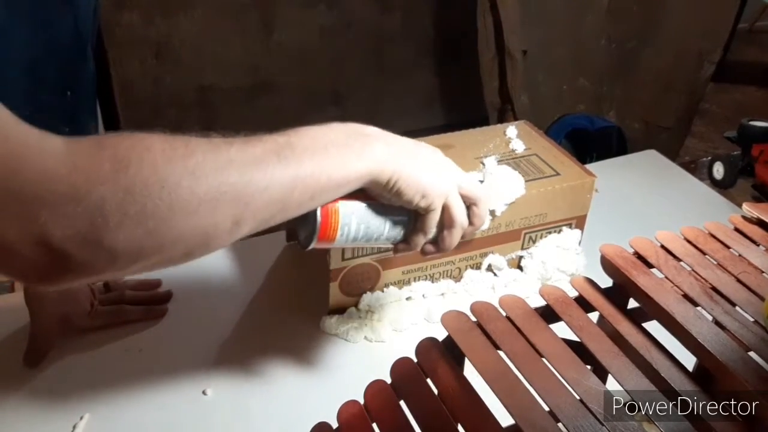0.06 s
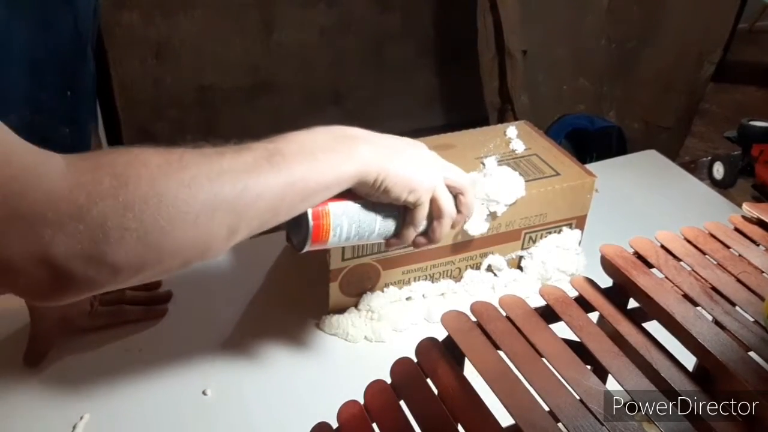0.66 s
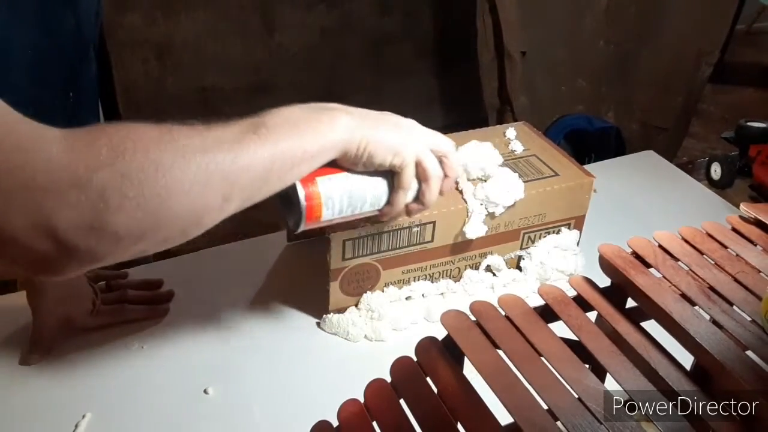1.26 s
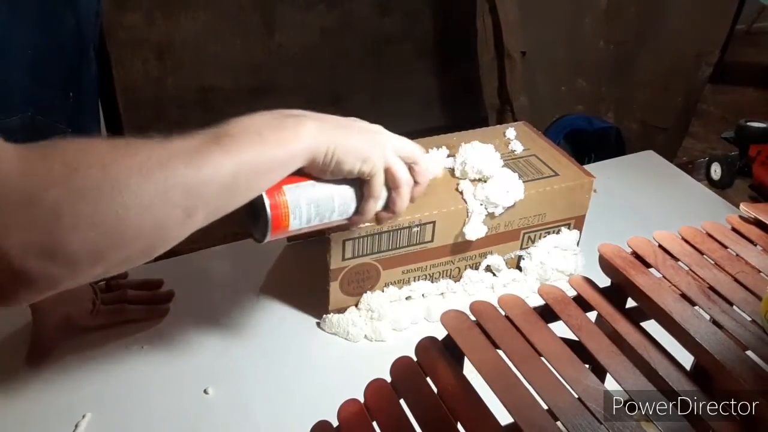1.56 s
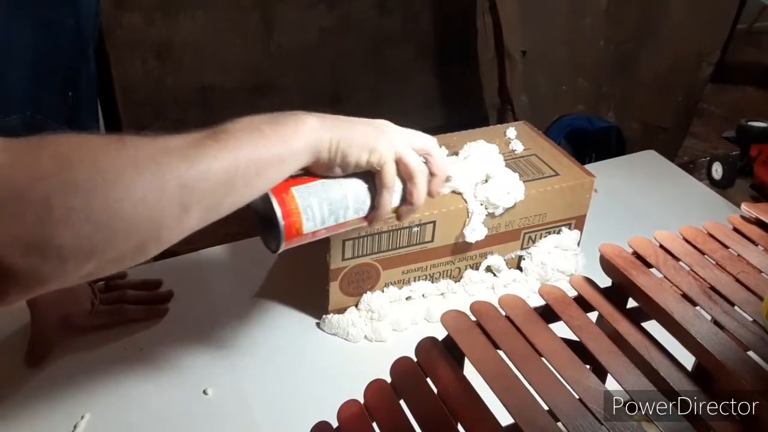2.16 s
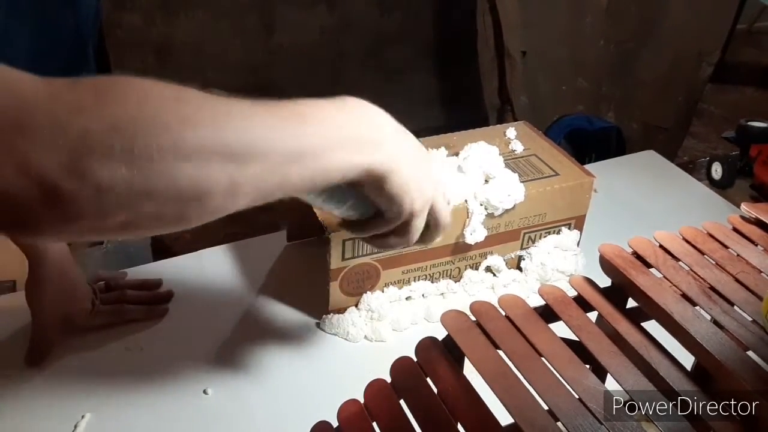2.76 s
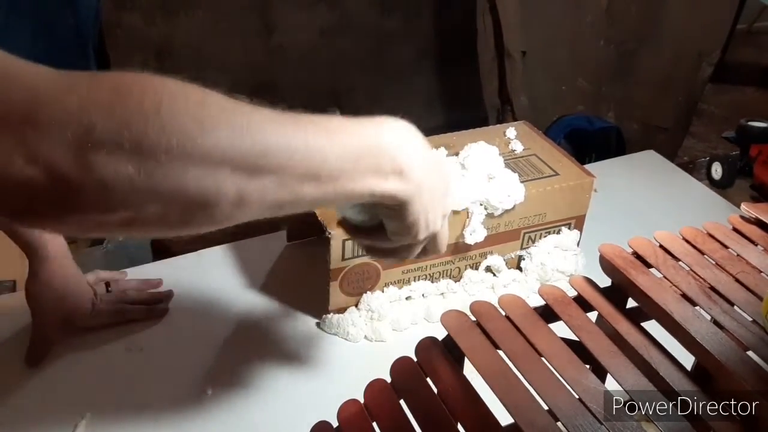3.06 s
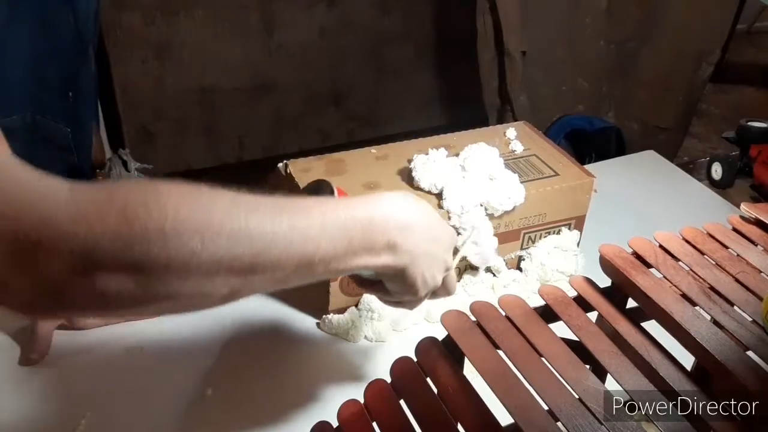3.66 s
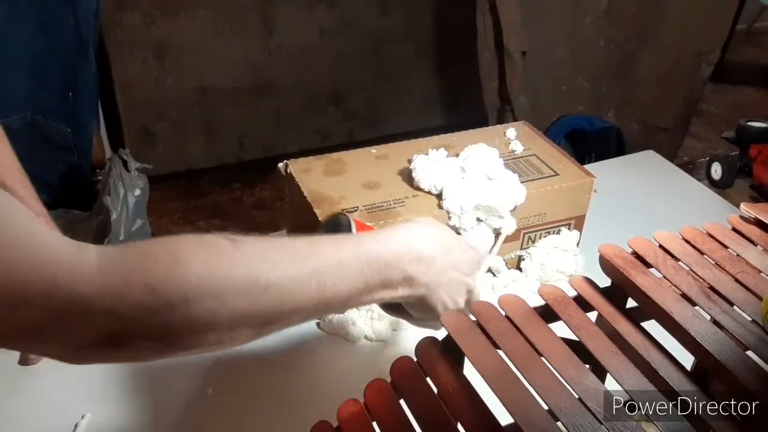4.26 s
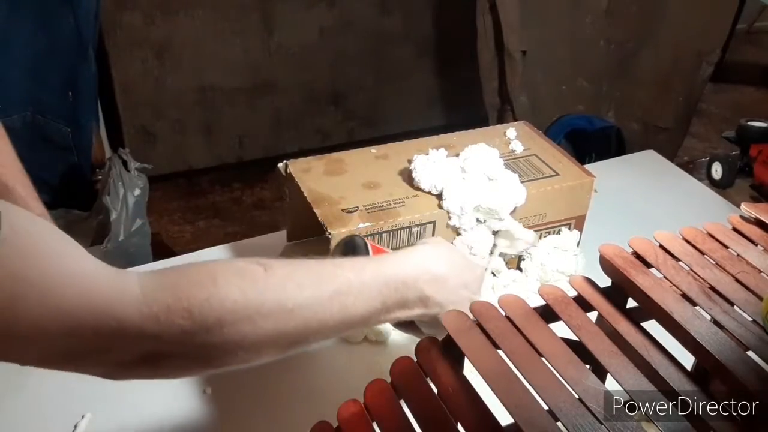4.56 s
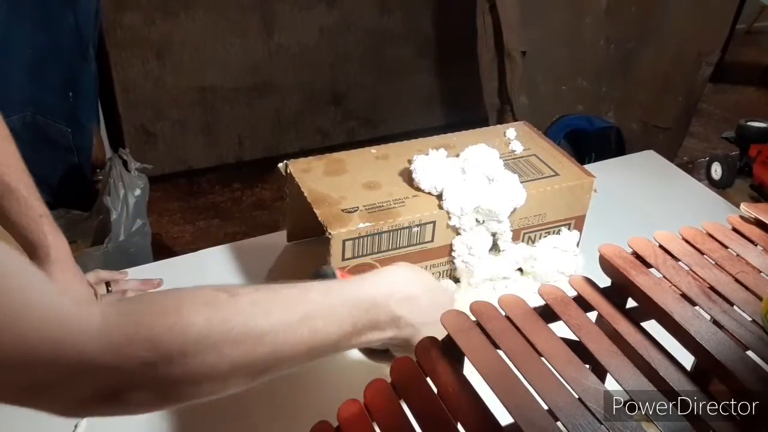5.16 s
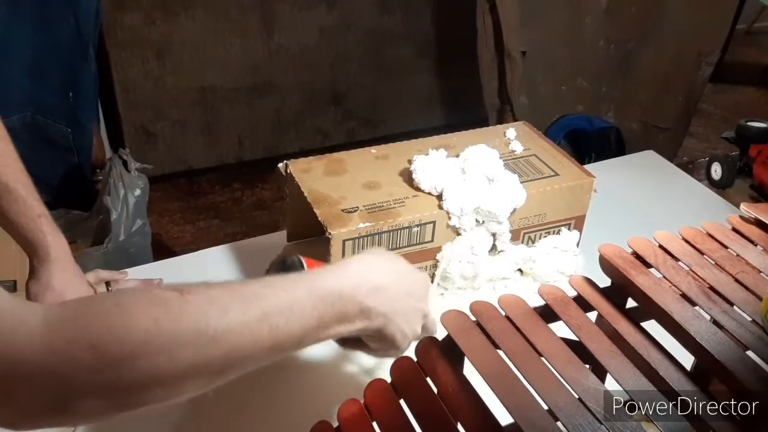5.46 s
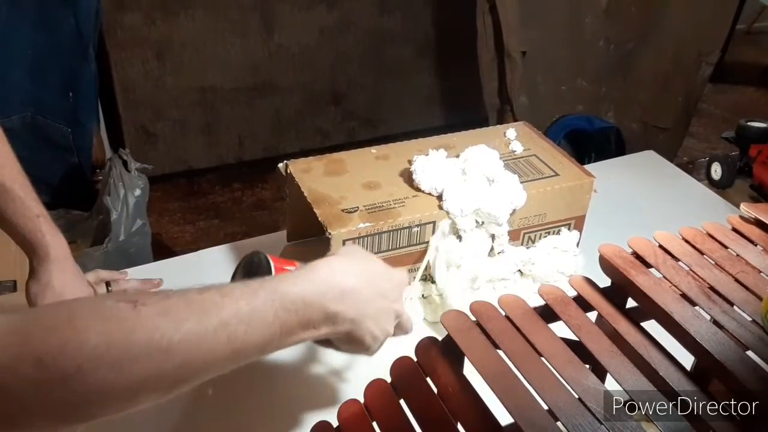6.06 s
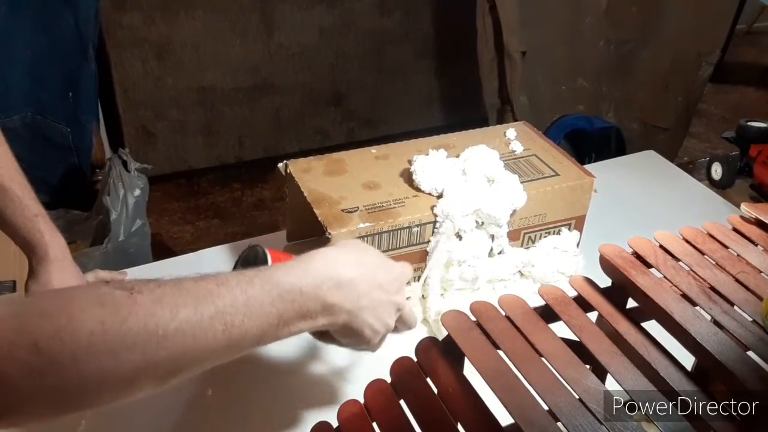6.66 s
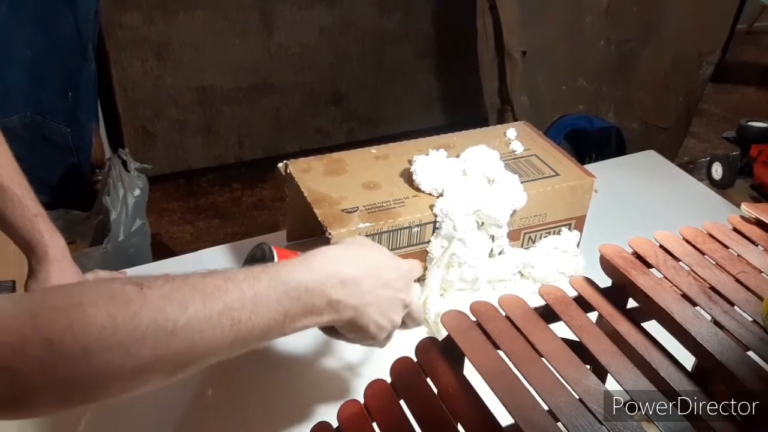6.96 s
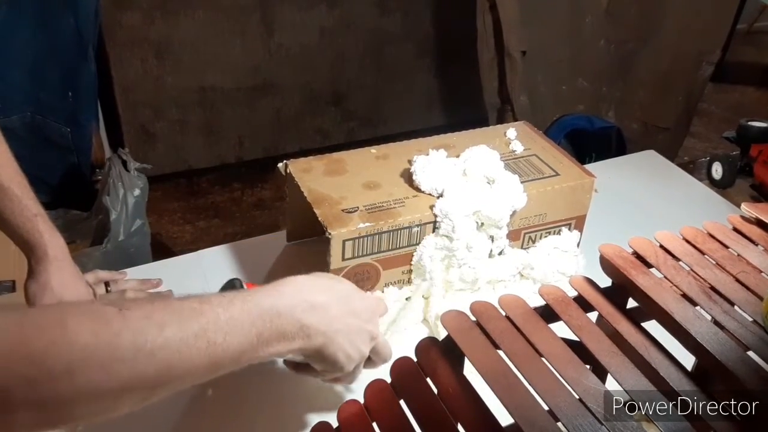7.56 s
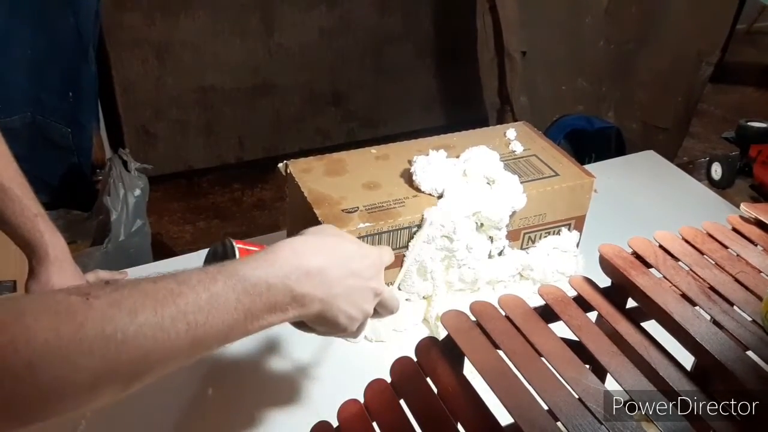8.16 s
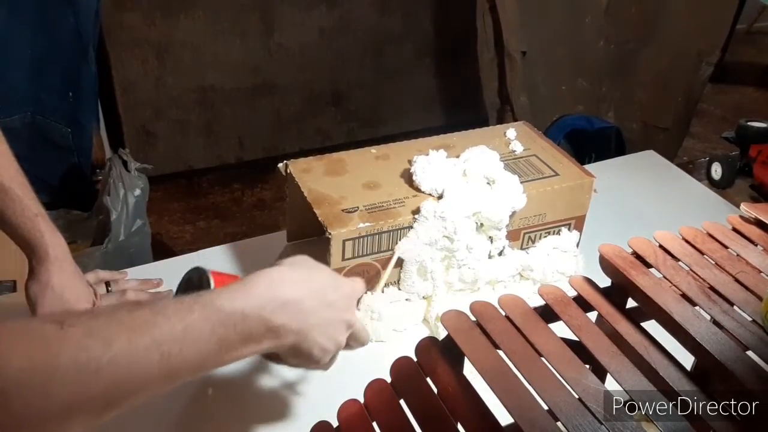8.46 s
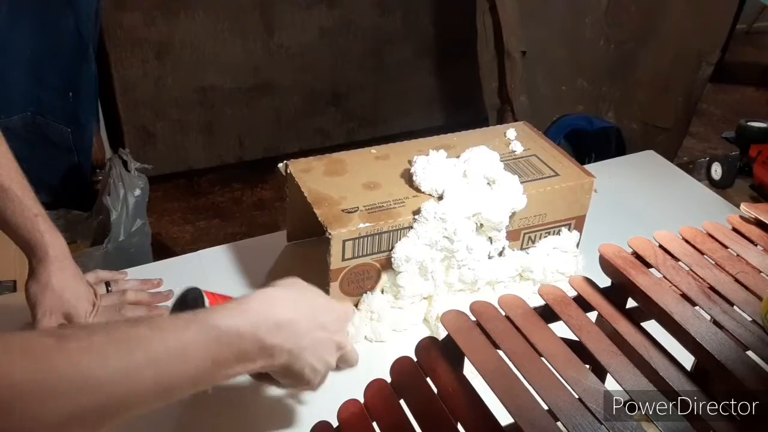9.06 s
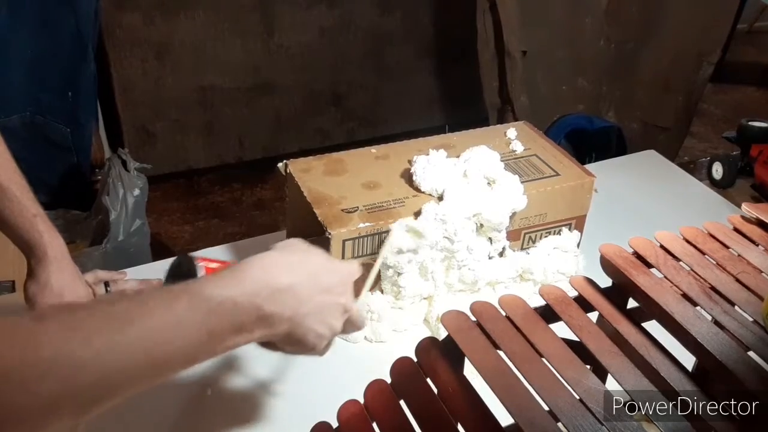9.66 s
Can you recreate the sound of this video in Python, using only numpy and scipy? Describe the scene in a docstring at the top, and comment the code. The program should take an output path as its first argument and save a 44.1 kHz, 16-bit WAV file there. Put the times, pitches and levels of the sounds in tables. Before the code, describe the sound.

Expanding foam sputters from the straw of an aerosol can, close to the microphone in a small workshop. It eases off almost at once, then resumes with wet crackling and squelching. Gas fizzes out and a cardboard box takes a soft bump. The nozzle gurgles and chokes, and two large bubbles pop. After another short pause the foam spits on, with a thin high hiss near the end, over a faint hum.

```python
"""A small workshop, a stereo microphone close to a cardboard box, a mains hum underneath.
Expanding foam sputters from an aerosol can's straw: bubbles burst at the tip and ring a swelling pocket.
The trigger is eased almost at once; by 1 s the flow is back. Around 2 s free gas fizzes and the box takes
a soft bump. Near 4 s the buried tip gurgles and chokes, and two large bubbles burst. After 6 s the
trigger is eased again; the foam spits and squelches on, with a thin high hiss of gas near the end."""
import sys
import numpy as np
from scipy import signal
from scipy.fft import rfft, irfft, next_fast_len
from scipy.io import wavfile
from scipy.ndimage import uniform_filter1d

SR = 44100
rng = np.random.default_rng(int(sys.argv[2]) if len(sys.argv) > 2 else 0)


def waveform_to_disk(signal):
    """Save audio, clipped to [-1, 1], as 16-bit WAV at the path in sys.argv[1]."""
    frames = np.transpose(np.atleast_2d(signal))
    scaled = np.clip(frames, -1, 1) * 32767
    samples = np.round(scaled).astype(np.int16)
    wavfile.write(sys.argv[1], SR, samples)


N = 432621
TIME = np.arange(N) / SR


def gain_of(db):
    """Decibels to amplitude."""
    return 10 ** (np.asarray(db) / 20)


def unit_rms(x):
    """Scales to rms 1."""
    return x / np.sqrt(np.mean(x ** 2) + 1e-20)


def curve_at(points, hz):
    """Joins (freq_hz, value) points on a log-frequency axis."""
    point_hz, value = np.transpose(points)
    return np.interp(np.log(hz + 1), np.log(point_hz + 1), value)


def filtered(x, response):
    """Applies a response given as a function of frequency."""
    size = next_fast_len(N + 4096)
    return irfft(rfft(x, size) * response(np.fft.rfftfreq(size, 1 / SR)), size)[..., :N]


def coloured(x, spectrum):
    """Gives x a spectrum, at rms 1."""
    return unit_rms(filtered(x, lambda hz: gain_of(curve_at(spectrum, hz))))


def wander(rate_hz):
    """A smooth random drift of rms 1, with little motion above rate_hz."""
    coarse = TIME[::32]
    hz = np.fft.rfftfreq(len(coarse), coarse[1])
    slow = rfft(rng.standard_normal(len(coarse))) / (1 + (hz / rate_hz) ** 4)
    return np.interp(TIME, coarse, unit_rms(irfft(slow, len(coarse))))


def resonate(x, hz, width_hz):
    """A resonance of gain 1 that follows the curve hz."""
    turn = np.exp(2j * np.pi * np.cumsum(hz * np.ones(len(x))) / SR)
    pole = np.exp(-np.pi * np.mean(width_hz) / SR)
    return 2 * (turn * signal.lfilter([1 - pole], [1, -pole], x / turn + 1e-18)).real


def ring(x, hz, width_hz):
    """The same resonance twice over, at rms 1."""
    return unit_rms(resonate(resonate(x, hz, width_hz), hz, width_hz))


def pops(per_s, spread_db, clump_db):
    """Bursting bubbles: clicks of uneven size that come in short clumps."""
    size = gain_of(spread_db * np.minimum(rng.exponential(1, N), 3.8))
    clicks = size * rng.choice([-1., 1.], N) * (rng.random(N) < per_s / SR)
    return unit_rms(clicks * gain_of(clump_db * np.tanh(wander(42))))


def swell(peak_s, rise_s, fall_s):
    """A smooth hump of height 1."""
    return np.exp(-((TIME - peak_s) / np.where(TIME < peak_s, rise_s, fall_s)) ** 2)


def burst(age_s, length_s, rise_s):
    """An envelope that starts abruptly, holds a moment and dies away."""
    return (1 - np.exp(-age_s / rise_s)) / (1 + (age_s / length_s) ** 4)


def glided(x, glide_s=0.12):
    """Turns steps into ramps."""
    smooth = uniform_filter1d(x[::32], size=round(glide_s * SR / 32), mode="nearest")
    return np.interp(TIME, TIME[::32], smooth)


# how alike the room sounds on both sides of the microphone: freq_hz, coherence
ROOM_COHERENCE = [(650, 0.85), (1400, 0.39), (5000, 0.013)]
def diffuse(pair):
    """Two unrelated signals become a diffuse field: alike in the bass, apart in the treble."""
    mid = filtered(pair[0], lambda hz: np.sqrt((1 + curve_at(ROOM_COHERENCE, hz)) / 2))
    side = filtered(pair[1], lambda hz: np.sqrt((1 - curve_at(ROOM_COHERENCE, hz)) / 2))
    return np.array([mid + side, mid - side])


# mains hum: pitch_hz, level_db
MAINS_HUM = [(60, -72.5), (120, -63.5)]
def room_tone():
    """Still air all round the microphone, and a wavering mains hum in the centre."""
    hum = sum(np.sqrt(2) * gain_of(db) * np.sin(2 * np.pi * hz * TIME + 0.52 * wander(8.6))
              for hz, db in MAINS_HUM)
    air_spectrum = [(25, -40), (49, -24), (86, -30), (118, -5), (150, -12.5), (285, -7.5),
                    (1910, -51), (15000, -26.5)]  # freq_hz, level_db
    return gain_of(-54.5) * coloured(diffuse(rng.standard_normal((2, N))), air_spectrum) + hum


# the workshop's decay: freq_hz, t60_s
ROOM_DECAY = [(200, 0.72), (1500, 0.37), (5000, 0.093), (15000, 0.16)]
def echoes():
    """The room's answer from one place of the can: sparse taps, each band dying at its own speed."""
    taps = rng.choice([-1., 1.], (2, SR // 2)) * (rng.random((2, SR // 2)) < 4000 / SR)
    hz, t, bands = signal.stft(taps, SR, nperseg=256)
    near = 1 + 0.78 * np.exp(-t / 0.026)  # bench and box answer first and loudest
    decay = gain_of(-60 * t / curve_at(ROOM_DECAY, hz)[:, None])
    tail = signal.istft(bands * near * decay, SR, nperseg=256)[1]
    return tail / np.linalg.norm(tail, axis=1, keepdims=True)


# hollows of the box and bench: pitch_hz, width_hz, gain_db
BENCH_HOLLOWS = [(353, 54, 5.5), (540, 79, 6.5), (664, 41, -1), (687, 21, 6.5), (739, 32, 4), (890, 21, 5),
                 (1022, 62, -6), (1073, 75, 4.5), (1724, 45, 2), (2840, 23, 3.5)]
# direct sound arriving at the microphone: freq_hz, left_lead_rad
ARRIVAL_PHASE = [(500, 0.15), (2500, 0.86), (4300, 0.7), (8000, 1), (10000, -1.74)]
# reflections against the direct sound: freq_hz, level_db
REFLECTIONS = [(250, -8.5), (800, 1.5), (1600, -1.5), (7000, 1.5)]
def workshop(x):
    """Near hollows colour the sound; its reflections shift as the hand moves the can."""
    x = x + sum((gain_of(db) - 1) * resonate(x, hz, width) for hz, width, db in BENCH_HOLLOWS)
    places = np.array([wander(5.62) for _ in range(3)])
    places /= np.linalg.norm(places, axis=0)
    wet = sum(signal.oaconvolve((x * share)[None], echoes(), axes=1)[:, :N] for share in places)
    direct = filtered(x, lambda hz: np.exp(.5j * np.outer([1, -1], curve_at(ARRIVAL_PHASE, hz))))
    return direct + filtered(diffuse(wet), lambda hz: gain_of(curve_at(REFLECTIONS, hz)))


# thin skins of the laid foam: pitch_hz, width_hz, gain_db
FOAM_SKINS = [(1940, 280, 8), (3280, 500, 1), (4270, 300, 18)]
def settling_foam():
    """Foam laid on the box keeps ticking faintly as it swells, ringing its skins."""
    ticks = coloured(pops(per_s=960, spread_db=-1, clump_db=-2), SPUTTER_SPECTRUM)
    skins = sum(gain_of(db) * resonate(ticks, hz, width) for hz, width, db in FOAM_SKINS)
    return gain_of(-60.5) * unit_rms(ticks + skins)


# soft bump on the box: start_s, level_db, length_s
BOX_BUMPS = [(2.005, -38, 0.067)]
# the cardboard's thud: freq_hz, level_db
THUD_SPECTRUM = [(30, -20), (130, 2), (450, 5), (900, -6), (3000, -35)]
def box_bump():
    """The cardboard gives a dull push with no ring."""
    push = sum(gain_of(db) * burst(np.maximum(TIME - start_s, 0), length_s, rise_s=0.0025)
               for start_s, db, length_s in BOX_BUMPS)
    return push * coloured(rng.standard_normal(N), THUD_SPECTRUM)


# large single bubbles: start_s, level_db, pitch_hz
LARGE_BUBBLES = [(3.855, -20, 1720), (4.223, -19.5, 1540), (6.579, -32, 3240), (6.643, -31, 3160),
                 (7.055, -25, 2360)]
def large_bubbles(ring_s=0.0021):
    """A large bubble bursts with a snap and rings its hollow for a few milliseconds."""
    snap, out = rng.standard_normal(N), np.zeros(N)
    for start_s, db, hz in LARGE_BUBBLES:
        at = np.flatnonzero((TIME >= start_s) & (TIME < start_s + 10 * ring_s))
        hollow = unit_rms(resonate(snap[at], hz, .5 * hz))
        out[at] += gain_of(db) * burst(TIME[at] - start_s, ring_s, rise_s=.0006) * hollow
    return out


# gas slugs: start_s, level_db, length_s, skin_pitch_hz, ring_db (against the spurt)
GAS_SLUGS = [(0.248, -25, .014, 4500, 0), (0.5, -61, .06, 2100, 8), (0.61, -53, 0.21, 4300, -22),
             (0.83, -42.5, 0.13, 5300, -3), (1.482, -24, 0.027, 4350, -12), (2.34, -30, .035, 3000, -1),
             (2.464, -20, 0.047, 5200, -7), (2.663, -26.5, 0.11, 5200, -8), (3.249, -18, 0.061, 3700, -7),
             (4.046, -30.5, 0.052, 3700, 2.5), (4.363, -26, .032, 3800, -7), (4.748, -31, 0.068, 3000, -4),
             (5.29, -38, 0.052, 4340, 12.5), (5.408, -28, 0.053, 3380, 8.5), (5.479, -22, 0.028, 3400, 1),
             (5.597, -22.5, 0.16, 3600, -2), (6.203, -22, .086, 5230, -3), (6.628, -48, 0.047, 3280, 6),
             (6.967, -39.5, 0.019, 4100, 12), (7.256, -37.5, 0.011, 3300, 15),
             (7.763, -28.5, 0.032, 3220, 6), (8.055, -29, 0.065, 3600, -2), (9.093, -44, 0.033, 2650, 19)]
# their spurt: freq_hz, level_db
SPIT_SPECTRUM = [(200, -37), (1500, -3), (3500, 7.5), (8000, 3), (16000, -11)]
def spits():
    """A slug of bare gas clears the straw with a short bright spurt and rings the skin it bursts."""
    gas = coloured(pops(per_s=14000, spread_db=3.2, clump_db=1.2), SPIT_SPECTRUM)
    out = np.zeros(N)
    for start_s, db, length_s, hz, ring_db in GAS_SLUGS:
        at = np.flatnonzero((TIME >= start_s) & (TIME < start_s + 4 * length_s))
        skin = gain_of(ring_db) * ring(gas[at], hz, 0.66 * hz)
        out[at] += gain_of(db) * burst(TIME[at] - start_s, length_s, rise_s=0.0032) * (gas[at] + skin)
    return out


# the trigger is eased: let_go_s, pressed_again_s, seep_db (just before it opens)
TRIGGER_PAUSES = [(0.274, 0.949, -21), (6.359, 6.75, -26)]
def valve_db(shut_db_per_s=189, seep_db_per_s=48, open_db_per_s=144):
    """Drop in flow: the valve shuts fast, seeps more as the finger tightens, then opens."""
    drop_db = np.zeros(N)
    for let_go_s, pressed_s, seep_db in TRIGGER_PAUSES:
        shutting = shut_db_per_s * (let_go_s - TIME)
        seeping = seep_db + seep_db_per_s * (TIME - pressed_s)
        opening = open_db_per_s * (TIME - pressed_s)
        drop_db += np.minimum(0, np.max([shutting, seeping, opening], axis=0))
    return drop_db


# pockets the tip opens in the foam: start_s, first_hz, last_hz, flow_db, surge_db, ring_db (against flow)
FOAM_POCKETS = [(0, 1520, 1120, -21.5, 1, -9), (.8, 1390, 1250, -23.5, 0, -11),
                (1.41, 1564, 1380, -28, 10.5, -13), (2.15, 1340, 1420, -24.5, -1, -7),
                (3.26, 1830, 1650, -26, 5, 3.5), (4.04, 1420, 1610, -26.5, 1, 2.5),
                (4.35, 1740, 1780, -26, 2.5, -8), (4.58, 1790, 1130, -25, 5, -5.5),
                (5.489, 2040, 1680, -21.5, 4.5, -2), (6.62, 1880, 1550, -33.5, 5.5, 4.5),
                (7.27, 2080, 1670, -30.5, 7.5, 3), (7.83, 2080, 1440, -27, 9.5, -0.5),
                (8.37, 1480, 2420, -25, -0.5, 3.5), (8.68, 2030, 1780, -24.5, 1.5, -1),
                (9.12, 2100, 1530, -24, 6, -9)]
def pockets(surge_s=0.39, forming_s=0.06, forming_db=-15):
    """Each pocket opens with a surge, rings weakly until formed and drifts in pitch as it swells."""
    start_s, first_hz, last_hz, flow_db, surge_db, ring_db = np.transpose(FOAM_POCKETS)
    current = np.maximum(np.searchsorted(start_s, TIME, side="right") - 1, 0)
    age_s = TIME - start_s[current]
    life_s = np.diff(start_s, append=N / SR)[current]
    pitch_hz = first_hz[current] * (last_hz / first_hz)[current] ** (age_s / life_s)
    surging_db = flow_db[current] + surge_db[current] * np.exp(-age_s / surge_s)
    ringing_db = ring_db[current] + forming_db * np.exp(-age_s / forming_s)
    return glided(pitch_hz), glided(surging_db), glided(ringing_db)


# the tip comes clear and gas hisses out: peak_s, rise_s, fall_s, fizz_db (against flow)
GAS_VENTS = [(0, .1, 0.049, -17), (1.87, 0.27, 0.18, 1.5), (2.72, 1, 0.19, -5), (3.12, 0.15, 0.16, -10.5),
             (4.48, 0.11, 0.085, -6), (4.9, 0.18, 0.6, -30), (5.66, 0.2, 0.086, -18),
             (6.26, 0.41, 0.1, -10), (6.82, 0.33, 0.15, -14.5), (7.5, 0.15, 0.073, -6.5),
             (8.02, 0.21, 0.29, -14), (8.85, 0.76, 0.14, -13.5), (9.45, 0.31, 0.33, -11)]
# foam plugs the tip: tightest_s, closing_s, clearing_s, flow_change_db, fizz_change_db
TIP_PLUGS = [(2.97, 0.09, 0.056, -1.5, -3.5), (3.23, 0.033, 0.013, 1.5, -12), (3.91, 0.11, 0.11, -9.5, 11),
             (4.15, 0.034, 0.037, -4, 14), (7.19, 0.051, 0.062, -6.5, 17.5), (7.68, 0.039, 0.046, 0, -16),
             (7.745, .025, .012, -5, 7), (7.82, 0.076, .018, -6, 5), (9.01, 0.046, 0.18, -6.5, -5)]
def jet(pocket_flow_db, buried_fizz_db=-23, escape_share=0.31):
    """Flow, and fizz against flow: valve and pocket set the flow, vents add fizz, plugs shift both."""
    flow_db = valve_db() + pocket_flow_db
    vented = sum(gain_of(db) * swell(peak_s, rise_s, fall_s) for peak_s, rise_s, fall_s, db in GAS_VENTS)
    fizz_db = 20 * np.log10(gain_of(buried_fizz_db) + vented)
    fizz_db -= escape_share * valve_db()  # the fizz escapes part of the valve's drop
    for tightest_s, closing_s, clearing_s, flow_change_db, fizz_change_db in TIP_PLUGS:
        plug = swell(tightest_s, closing_s, clearing_s)
        flow_db += flow_change_db * plug
        fizz_db += fizz_change_db * plug
    return flow_db, fizz_db


# sizzle of free gas: freq_hz, level_db
FIZZ_SPECTRUM = [(800, -71), (4000, -10.5), (5300, 5.5), (6300, 4.5), (8200, 3.5), (9300, 1), (11700, 6.5),
                 (16000, -1.5)]
def fizz(flow_db, fizz_db):
    """Free gas tears a surging mist of tiny bubbles whose sizzle scatters all round the microphone."""
    mist = np.array([pops(per_s=18000, spread_db=-3, clump_db=7) for side in range(2)])
    surge_db = 7.8 * np.tanh(wander(11))
    return gain_of(flow_db + fizz_db - 5 + surge_db) * coloured(mist, FIZZ_SPECTRUM)


# the gurgle, one curve for each press of the trigger: time_s, level_db, bass_lift_db
GURGLE_CURVES = [
    [(0.114, -39, 0), (0.25, -40, 0)],
    [(.75, -26, 7), (.93, -38.5, -5), (3.18, -41.5, 1), (3.76, -34, -2), (3.94, -43, 8), (4.22, -37.5, 1.5),
     (5.0, -30, -7.5), (5.42, -31.5, -3), (5.62, -34.5, -3.5), (6.3, -38.5, -3)],
    [(6.55, -34, 8), (6.8, -39, -0.5), (7.11, -34.5, -7), (7.29, -39.5, 3.5), (7.79, -32.5, -1),
     (8.16, -40, 5), (8.55, -37.5, 2), (8.93, -32.5, 5), (9.25, -39.5, 0), (9.8, -37.5, -4)],
]
# bubbling under the foam: freq_hz, level_db
GURGLE_SPECTRUM = [(50, -43), (140, -15), (230, -8), (320, 1.5), (420, -7), (510, 2), (700, 0.5),
                   (1000, 3.5), (1400, 7), (4000, -33)]
def gurgle(bass_hz=450):
    """Gas bubbles up through the foam while the valve is open; the deeper the tip, the more bass."""
    time_s, level_db, bass_lift_db = np.vstack(GURGLE_CURVES).T
    bubbles = coloured(pops(per_s=3500, spread_db=1, clump_db=-2.1), GURGLE_SPECTRUM)
    bass = filtered(bubbles, lambda hz: 1 / (1 + (hz / bass_hz) ** 6))
    bubbles += bass * (gain_of(np.interp(TIME, time_s, bass_lift_db)) - 1)
    return gain_of(.8 * valve_db() + np.interp(TIME, time_s, level_db)) * bubbles


# squelching blisters and, last, a hiss of gas: start_s, length_s, start_hz, end_hz, level_db (against flow)
SQUELCHES_AND_HISS = [(0.926, 0.22, 2680, 2780, -1.5), (1.345, 0.13, 3320, 3040, -0.5),
                      (1.75, 0.44, 4140, 3900, -3.5), (2.135, 0.32, 2700, 3050, -0.5),
                      (2.99, 0.24, 2570, 2670, 0), (3.25, 0.31, 2300, 1630, -0.5),
                      (3.49, 0.19, 2900, 3000, 0.5), (4.163, 0.094, 2500, 2750, -1),
                      (4.358, .21, 3900, 4030, 3), (4.576, 0.13, 2540, 2090, 2),
                      (5.435, 0.19, 2900, 2800, -1), (5.504, 0.29, 4300, 4330, -1.5),
                      (5.835, 0.62, 4350, 5000, -4.5), (6.736, 0.32, 1950, 1850, 3.5),
                      (6.97, 0.16, 3900, 3800, -2.5), (7.258, 0.62, 2950, 2700, 0),
                      (7.805, 0.17, 2790, 3070, -2), (7.89, 0.5, 4170, 4660, -4),
                      (8.023, 0.24, 3730, 3030, 1.5), (8.465, 0.15, 3820, 4300, 1),
                      (9.11, 0.21, 2780, 2560, -0.5), (9.216, 0.21, 3950, 3600, 0.5),
                      (9.336, 0.45, 5100, 5070, -2.5), (9.37, 0.25, 11800, 11400, -5.5)]
def squelches_and_hiss(width_share=0.35):
    """Blisters squelch, gliding as they change size; near the end escaping gas gives a thin high hiss."""
    drive, out = pops(per_s=3000, spread_db=2.5, clump_db=2.5), np.zeros(N)
    for start_s, length_s, start_hz, end_hz, db in SQUELCHES_AND_HISS:
        at = np.flatnonzero((TIME >= start_s) & (TIME < start_s + length_s))
        pitch_hz = np.geomspace(start_hz, end_hz, len(at))
        fade = signal.windows.tukey(len(at), .7)
        out[at] += gain_of(db) * fade * ring(drive[at], pitch_hz, width_share * pitch_hz)
    return out


def straw(x, fizz_db, pipe_hz=1362, echo=0.19, clear_db=-1):
    """The straw is a short pipe with an echo off its open end; its overtones show once the tip is clear."""
    piped = filtered(x, lambda hz: np.sqrt(1 - echo ** 2) / (1 - echo * np.exp(-2j * np.pi * hz / pipe_hz)))
    clear = np.minimum(1, gain_of(fizz_db - clear_db))
    return x + (piped - x) * clear


def horn(x, cutoff_hz, patchy_db):
    """Like a short horn, the pocket passes little bass; folds of foam favour passing patches of spectrum."""
    hz, t, bands = signal.stft(x, SR, nperseg=512)
    ratio = (hz[:, None] / np.interp(t, TIME, cutoff_hz)) ** 6
    high_pass = ratio / np.hypot(1, ratio)
    patches = rng.standard_normal(bands.shape)
    for _ in range(2):
        patches = uniform_filter1d(uniform_filter1d(patches, size=5, axis=0), size=8, axis=1)
    folds = gain_of(patchy_db * unit_rms(patches))
    return signal.istft(bands * high_pass * folds, SR, nperseg=512)[1][:N]


def pocket_ring(pitch_hz):
    """Popping rings the pocket at its pitch and, more weakly, an octave up."""
    drive = pops(per_s=4500, spread_db=1, clump_db=0.5)
    fundamental = unit_rms(resonate(resonate(drive, pitch_hz, 1180), pitch_hz, 1160))
    return fundamental + gain_of(-13) * ring(drive, 2 * pitch_hz, 560)


# bubbles bursting in the foam: freq_hz, level_db
SPUTTER_SPECTRUM = [(400, -1), (1000, 1), (1800, 4), (3000, 4), (4300, 1.5), (5400, -3), (7000, -14.5),
                    (10000, -28), (16000, -45)]
def foam(flow_db, fizz_db, pocket_hz, ring_db):
    """Bubbles burst at the straw's tip; the flow sets their strength and the foam pocket their vowel."""
    flow = gain_of(flow_db + 0.5 * wander(20.5))  # the valve feeds unevenly
    bursts = pops(per_s=6000, spread_db=3.5, clump_db=2)
    pitch_hz = pocket_hz * np.exp(0.044 * wander(7.7))  # the pocket's walls tremble
    pocket = gain_of(ring_db) * pocket_ring(pitch_hz)
    sputter = coloured(bursts, SPUTTER_SPECTRUM)
    treble = filtered(sputter, lambda hz: 1 - 1 / (1 + (hz / 3600) ** 4))
    sputter += treble * (gain_of(0.31 * (fizz_db + 18.5)) - 1)  # foam over the tip muffles the treble
    voiced = horn(straw(sputter, fizz_db) + pocket, .87 * pitch_hz, patchy_db=1.87)
    crackle = gain_of(fizz_db) * coloured(bursts, FIZZ_SPECTRUM)
    return flow * (voiced + squelches_and_hiss() + crackle)


def scene():
    """The spray on the box close by, with the workshop around it."""
    pocket_hz, pocket_flow_db, ring_db = pockets()
    flow_db, fizz_db = jet(pocket_flow_db)
    at_tip = foam(flow_db, fizz_db, pocket_hz, ring_db) + gurgle() + spits()
    on_box = large_bubbles() + settling_foam() + box_bump()
    return gain_of(-4) * workshop(at_tip + on_box) + fizz(flow_db, fizz_db) + room_tone()


# the microphone's balance: freq_hz, left_minus_right_db
MIC_BALANCE = [(150, 2.5), (4500, -0.5), (8000, 5.5), (12000, 3)]
def record(dry, low_cut_hz=45, ceiling=.75, top_hz=15700):
    """The microphone sheds the lowest bass, leans left, rounds the tallest pops and loses the very top."""
    low_cut = lambda hz: hz ** 2 / np.hypot(hz ** 2, low_cut_hz ** 2)
    balance = lambda hz: gain_of(np.outer([.5, -.5], curve_at(MIC_BALANCE, hz)))
    heard = filtered(dry, lambda hz: low_cut(hz) * balance(hz))
    rounded = heard / (1 + (heard / ceiling) ** 4) ** .25
    band_limit = signal.firwin(511, top_hz, window=("kaiser", 9), fs=SR)
    return signal.oaconvolve(rounded, band_limit[None], "same")


dry = scene()
out = record(dry)
waveform_to_disk(out)
```